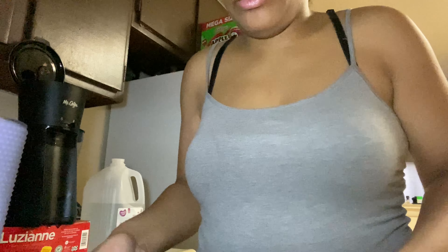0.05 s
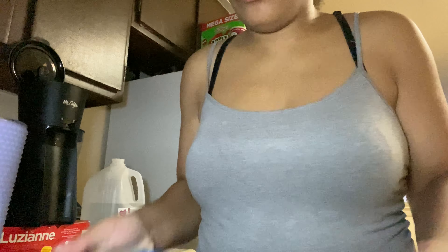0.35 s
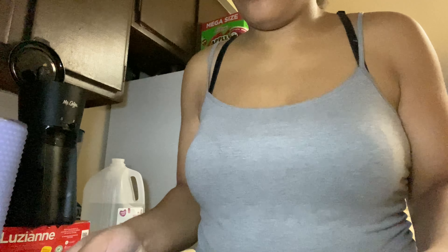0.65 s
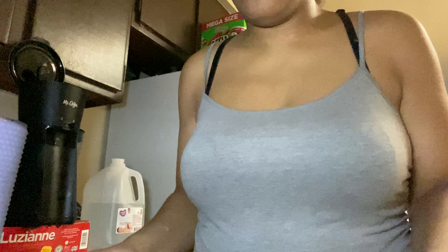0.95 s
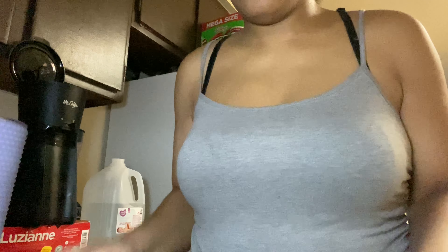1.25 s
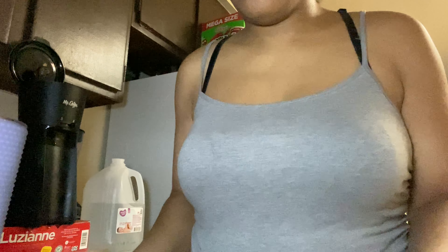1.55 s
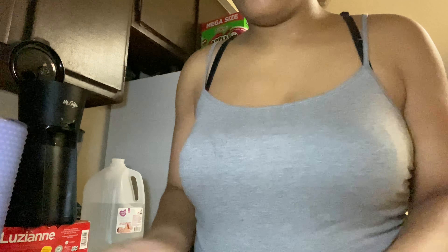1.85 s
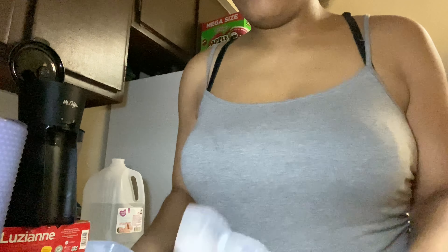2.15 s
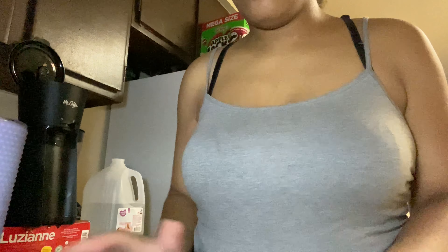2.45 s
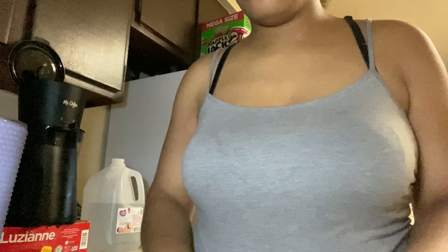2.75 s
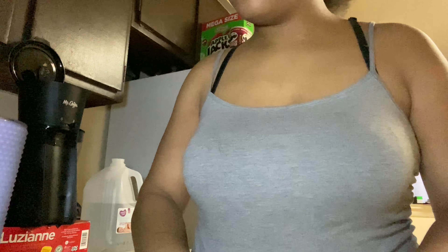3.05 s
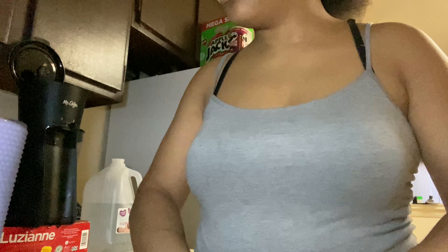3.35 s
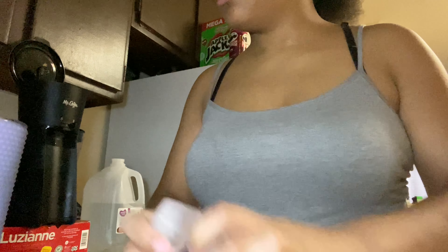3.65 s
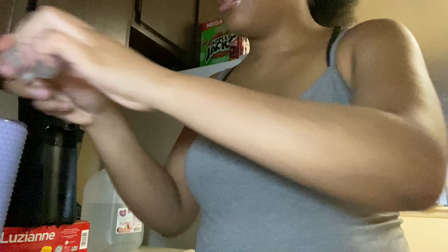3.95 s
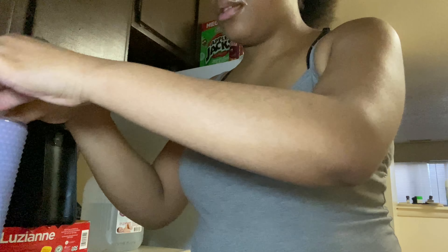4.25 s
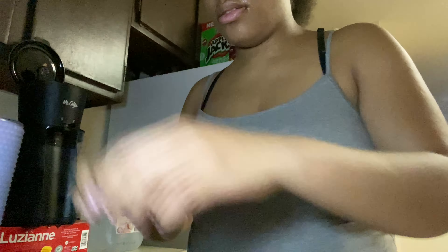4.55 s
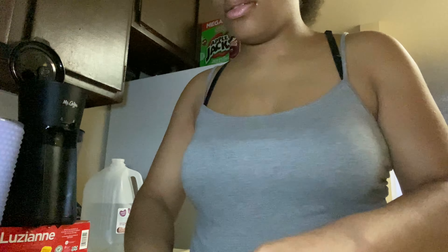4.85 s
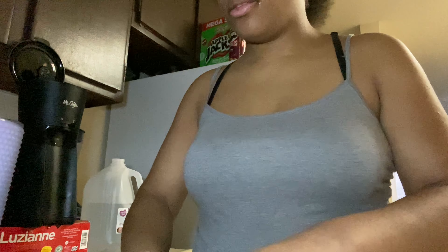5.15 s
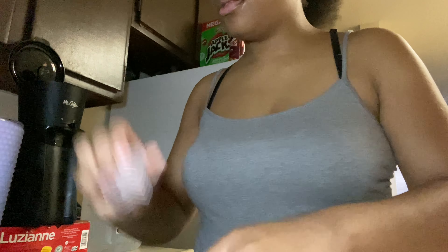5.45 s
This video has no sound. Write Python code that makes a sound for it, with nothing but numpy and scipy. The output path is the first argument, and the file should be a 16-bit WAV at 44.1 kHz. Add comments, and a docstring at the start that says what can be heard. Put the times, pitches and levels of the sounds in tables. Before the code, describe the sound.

Ice cubes crack and clatter in a twisted plastic tray, then a few drop into a ringing tumbler in a kitchen.

```python
"""Ice cubes clatter and crunch in a plastic tray, twisted again and again on a kitchen counter.
Cubes crack, squeak and tear from the plastic, then knock in their pockets. A few drop into a ringing
tumbler before the tray is handled again. Heavy blows sway the counter and a small hard room answers.
The sound is close; a limiter holds the peaks."""
import sys
import numpy as np
from scipy import signal
from scipy.fft import rfft, irfft
from scipy.io import wavfile
from scipy.ndimage import uniform_filter1d, minimum_filter1d

SR = 44100
rng = np.random.default_rng(int(sys.argv[2]) if len(sys.argv) > 2 else 0)


def file_out(sig):
    """Save sig as 16-bit WAV at sys.argv[1]."""
    # one column per channel
    cols = np.atleast_2d(sig).T
    # limit, then scale
    lim = np.clip(cols, -1, 1)
    pcm = np.round(lim * 32767).astype(np.int16)
    wavfile.write(sys.argv[1], SR, pcm)


N = 247842
TIME_S = np.arange(N) / SR
AGE_S = TIME_S[:SR // 10]  # time since a contact

# Loose cubes tumbling. Each row: start in s, length in s, level in dB, ring in Hz, tick offset in dB.
CLATTERS = [(0.303, 0.041, -8.5, 1610, -7), (0.536, 0.02, -15, 1250, -8), (0.858, 0.028, -6.5, 1785, -8.5),
            (.91, .02, -14.5, 1940, -3.5), (0.954, 0.029, -19, 1460, -4), (1.4, 0.06, -8, 1523, -7),
            (1.477, 0.062, -14.5, 1760, -18), (2.181, 0.19, -17, 1590, -5), (2.502, 0.17, -30, 1420, -12),
            (2.778, 0.16, -29, 1100, -3.5), (3.08, 0.034, -38, 1010, -5), (3.191, 0.06, -29, 1120, -7),
            (3.352, 0.022, -37.5, 1200, -31), (5.202, .04, -32, 2000, -3), (5.434, 0.032, -39.5, 2070, 0)]
# Dull blows of tray and tumbler. Each row: start in s, level in dB, centre in Hz.
BUMPS = [(0.04, -34, 160), (0.301, -21.5, 112), (.536, -22, 507), (1.391, -13, 461), (1.397, -21, 118),
         (2.008, -23.5, 808), (2.017, -25, 502), (2.022, -20.5, 168), (2.196, -15.5, 288),
         (2.202, -15, 163), (3.104, -30, 1134), (3.213, -28, 757), (4.134, -25.5, 344), (4.434, -17, 402),
         (4.44, -16.5, 168), (4.536, -13.5, 224), (4.775, -25, 490), (4.825, -27.5, 423)]
# Contact spectra, midrange clack and bright tick. Each row: frequency in Hz, density in dB.
CLACK_SPECTRUM = [(250, -20), (450, 6), (800, 2.5), (1300, -2), (2000, -1), (2700, -2), (3500, 1),
                  (4600, -18.5), (8000, -30)]
TICK_SPECTRUM = [(1200, -33), (2500, 4.5), (3600, 6.5), (5200, 1.5), (7500, 3), (10000, 2), (13000, 2.5),
                 (16000, -4)]


def knocks(clack_db=-9, ring_db=-7, tick_db=-7, thud_db=-9):
    """Each cube gives a clack of the whole tray, a short ring of its pocket, a hard tick and a thud."""
    # Each row: start in s, level in dB, ring in Hz, tick and thud offsets in dB.
    single_knocks = [(.042, -32.5, 2670, 9.5, -2.5), (.271, -30.5, 1630, 1, 9), (.3, -4, 1666, -5, -11),
                     (0.316, -11.5, 1330, -20, -6), (.339, -17, 1500, -13, -22.5), (.534, 0, 1280, -2, -27),
                     (.538, -3.5, 673, -2, -32), (.565, -3.5, 1690, -9, -17), (0.847, 6, 1940, -21, -20.5),
                     (.854, -4.5, 740, 6.5, -28), (0.859, -13, 1480, -15, -29), (.939, 7.5, 1884, -31, -37),
                     (0.949, -12, 1850, -5.5, -7.5), (.992, -9, 1685, -8, -28),
                     (1.065, -18, 1780, -12, -27), (1.119, -13, 1456, -9, -12),
                     (1.105, -28, 1730, -26, -35), (1.354, -13.5, 1340, 6, -24),
                     (1.391, -1, 1180, -12, -1.5), (1.411, 4.5, 2006, -4, -16), (1.438, -1, 1614, -13, -10),
                     (1.466, -5, 1480, -18, -37), (1.483, -6.5, 1880, -22.5, -25),
                     (1.5, -4, 1950, -7.5, -15), (1.545, -15, 1320, -11.5, -19.5),
                     (1.555, -11, 1510, 0.5, -7), (1.602, -17.5, 1170, -11, 2.5),
                     (1.624, -16, 1207, 0, -19), (1.649, -23.5, 1704, -5, -9), (2.041, -21, 1784, 0.5, 2),
                     (2.194, -0.5, 1210, -13.5, -8), (2.212, -6, 2220, -18, -28),
                     (2.274, -2.5, 2070, -13, -33), (2.3, -8.5, 2200, -17, -13),
                     (2.306, -12, 2100, -22, -30), (2.354, -16, 1980, -21.5, -17.5),
                     (2.359, -11.5, 1270, -15, 0), (2.404, -24, 1630, -14, -19),
                     (2.455, -12, 1220, -21.5, -3.5), (2.491, -22, 1170, -8, -2),
                     (2.56, -18, 1410, -9, -19), (2.642, -21, 1950, -9, -25.5),
                     (2.655, -20, 1890, -16.5, -24), (2.746, -12, 1134, -15.5, -21),
                     (2.756, -9.5, 1616, -14.5, -32), (2.786, -21.5, 1090, -8, -27.5),
                     (2.807, -18, 1340, -6, -7), (2.83, -26, 1120, -8, -10), (2.928, -10.5, 1370, -16, -28),
                     (2.976, -20.5, 1520, -1.5, -28), (3.101, -25, 1100, -24, -21),
                     (3.118, -19, 1090, -13.5, -12), (3.213, -16.5, 1880, -13.5, -31),
                     (3.249, -21.5, 1046, -20, -15), (3.313, -24.5, 1140, -16, -23),
                     (3.379, -28, 1094, -33, -11.5), (4.856, -25.5, 1315, -10.5, -24.5),
                     (4.886, -30, 1490, -3, -30), (4.938, -28, 1610, 1.5, -17), (5.016, -23, 986, -24, -6),
                     (5.024, -31, 1370, -23, -8), (5.079, -35, 1310, -19, 7), (5.152, -30.5, 2500, 2, -3),
                     (5.369, -19.5, 2040, 0, -13)]
    # Each row: frequency in Hz, density in dB.
    thud_spectrum = [(50, -26), (110, 4), (200, -1.5), (400, 3), (600, -7.5), (1000, -22), (2500, -54.5)]
    out = np.zeros(N)
    for start_s, db, hz, tick_offset_db, thud_offset_db in single_knocks + clatter_knocks():
        # a soft contact lasts longer and leaves out the upper modes
        softened = resonate(burst(.036, CLACK_SPECTRUM), hz, 1.5 * hz)
        clack = blow(tray_body(softened, direct=.48))
        pocket = modal(hz * np.array([.86, 1, 1.12]), [-6, 0, -6], .024, AGE_S, scatter_db=.5)
        ring = blow(pocket * rise(AGE_S, .00068))
        tick = blow(facets(burst(.021, TICK_SPECTRUM), direct=.3, width_hz=220))
        sound = undb(clack_db) * clack + undb(ring_db) * ring
        sound += undb(tick_db + tick_offset_db) * tick
        sound += undb(thud_db + thud_offset_db) * burst(.086, thud_spectrum)
        add(out, start_s, undb(db) * sound)
    return out


def clatter_knocks(count=5, spread_db=.5, spread_octaves=.2, thud_offset_db=-22):
    """Rows for knocks(): a clatter is a few unevenly spaced hits, each from another cube."""
    rows = []
    for start_s, length_s, db, hz, tick_offset_db in CLATTERS:
        times_s = start_s + length_s * (np.arange(count) + rng.random(count)) / count
        for hit_s, (force, detune, edge) in zip(times_s, rng.standard_normal((count, 3))):
            rows.append((hit_s, db + spread_db * force, hz * 2 ** (spread_octaves * detune),
                         tick_offset_db + spread_db * edge, thud_offset_db))
    return rows


def tray_body(x, direct):
    """Sound passes through the resonances of the plastic tray."""
    # Each row: frequency in Hz, width in Hz, gain in dB.
    modes = [(450, 210, -4.5), (760, 140, -13), (923, 140, -4), (1087, 190, -0.5), (1194, 85, 7),
             (1434, 100, 3.5), (1561, 70, 9), (1788, 140, 7), (1980, 36, 1.5), (2090, 70, -2),
             (2694, 190, -5), (3438, 250, -2.5), (4436, 170, 1.5)]
    return direct * x + sum(undb(db) * resonate(x, hz, width_hz) for hz, width_hz, db in modes)


def facets(x, direct, width_hz, count=9):
    """Each piece of ice has its own bright resonances; the lowest is width_hz wide."""
    modes_hz = 2500 * 5.6 ** ((np.arange(count) + rng.random(count)) / count)
    return direct * x + sum(resonate(x, hz, width_hz * np.sqrt(hz / modes_hz[0])) for hz in modes_hz)


def crunches():
    """Ice tears from the flexing plastic in showers of tiny fractures, each from another cube."""
    # Each row: crest in s, level in dB, half width in s.
    showers = [(.004, -37.5, 0.0081), (.14, -31.5, .017), (.234, -32.5, .014), (.314, -13, 0.018),
               (0.463, -27, 0.0061), (0.498, -33, 0.0099), (.524, -16, 0.0031), (0.538, -27, 0.009),
               (0.568, -17, 0.0054), (.722, -35.5, 0.019), (0.818, -16, 0.0091), (0.871, -20.5, 0.019),
               (.95, -26.5, 0.044), (1.128, -25, 0.011), (1.258, -37, 0.0084), (1.351, -19.5, 0.0049),
               (1.424, -20, 0.047), (1.6, -23, 0.016), (1.655, -23.5, 0.01), (2.051, -26.5, 0.0099),
               (2.148, -15, .0092), (2.228, -27.5, 0.066), (2.668, -36.5, 0.017), (2.818, -39.5, 0.016),
               (2.977, -39, 0.013), (4.524, -19, 0.014), (5.149, -40.5, 0.0091), (5.224, -40, 0.028),
               (5.281, -41, 0.0079), (5.35, -34.5, 0.0059), (5.46, -40.5, 0.012)]
    # Each row: frequency in Hz, density in dB.
    spectrum = [(150, -47.5), (400, -18), (800, -3.5), (1250, -5), (2200, -2), (2800, -5), (3600, -3),
                (5200, -8.5), (7400, -4.5), (9600, -4), (12400, -7), (16000, -10)]
    out = np.zeros(N)
    fractures = colour(grains(rate_per_s=4000, spread_db=3), spectrum)
    body = tray_body(fractures, direct=0)
    for crest_s, db, half_width_s in showers:
        span, envelope = swell(crest_s, half_width_s)
        cube = facets(fractures[span], direct=.45, width_hz=480)
        out[span] += undb(db) * envelope * unit(cube + 1.1 * body[span])
    return out


def squeaks(waver_hz=260):
    """A cube sticks and slips on the plastic so fast that it sings briefly on one rough pitch."""
    # Each row: crest in s, level in dB, pitch in Hz.
    slips = [(.139, -28, 4300), (.168, -29, 3850), (.229, -31, 4400), (.303, -19, 3650), (.331, -16, 3550),
             (.52, -23, 4400), (.563, -21, 9500), (.82, -22, 3450), (1.354, -20, 3600), (2.328, -26, 3950),
             (3.24, -36, 4430), (5.213, -31, 2100), (5.446, -33, 2000), (5.466, -30, 2100)]
    out = np.zeros(N)
    waver = wander(samples=40)
    for crest_s, db, hz in slips:
        span, envelope = swell(crest_s, half_width_s=.0035)
        pitch_hz = hz + waver_hz * waver[span]
        out[span] += undb(db) * blow(envelope * np.sin(2 * np.pi * np.cumsum(pitch_hz) / SR))
    return out


def tumbler(clack_db=-3, ring_db=-2, tick_db=-1, thud_db=-1):
    """Cubes hit the rim, fall to the bottom and bounce; every blow rings the wall."""
    # Each row: start in s, level in dB, then tick, thud and ring offsets in dB.
    drops = [(4.126, -35, 7, 10.5, -20), (4.167, -38, -11, -21, -17), (4.237, -51.5, 3, 16, -13),
             (4.258, -38.5, 6, -1, -23), (4.305, -37, 8, 12, -10), (4.432, -8, -13.5, -3, -1.5),
             (4.44, -19.5, 4.5, 0.5, 12), (4.521, -14, -20, -11, 1), (4.528, -13, -3, -11, 5),
             (4.538, -13.5, -0.5, -7.5, 5.5), (4.587, -26.5, -2, 1, 7), (4.61, -17, -9, -11, -1),
             (4.703, -22, -25, -1.5, 4.5), (4.825, -30.5, -25, 6, 1)]
    # Each row: frequency in Hz, level in dB, t60 in s.
    wall_modes = [(222, -11, .16), (338, -12, .24), (461, 3, .27), (715, -2, .15), (791, -7, .35),
                  (1175, -10, .36), (1715, -3, .13), (1835, -3, .12), (1885, -1, .22), (2110, -9, .25),
                  (2645, -2, .2), (2750, -4, .18), (3350, -9, .15), (3994, -14, .28), (4900, 0, .13),
                  (5400, -11, .08), (5900, -10, .12), (6282, -11, .12), (6928, -14, .09), (8129, -21, .22),
                  (8400, -8.5, .1)]
    # Air and floor of the tumbler under a blow. Each row: frequency in Hz, density in dB.
    hollow_spectrum = [(60, 0), (130, 2), (210, 6), (380, 12.5), (540, -15.5), (800, 5), (1200, -9),
                       (2500, -71)]
    contacts, ringing = np.zeros(N), np.zeros(N)
    for start_s, db, tick_offset_db, thud_offset_db, ring_offset_db in drops:
        ring = modal(*np.transpose(wall_modes), TIME_S[:SR // 2], scatter_db=3.5)
        add(ringing, start_s, undb(db + ring_db + ring_offset_db) * ring)
        tick = blow(facets(burst(.068, TICK_SPECTRUM), direct=.23, width_hz=960))
        contact = undb(clack_db) * burst(.06, CLACK_SPECTRUM) + undb(tick_db + tick_offset_db) * tick
        contact += undb(thud_db + thud_offset_db) * burst(.095, hollow_spectrum)
        add(contacts, start_s, undb(db) * contact)
    # loose ice chatters against the wall and roughens its ring
    chatter = 1 + .42 * wander(samples=260)
    return contacts + chatter * ringing


def bumps():
    """Dull blows on the counter: a soft push into a few low, quickly damped modes."""
    out = np.zeros(N)
    ratios, modes_db = np.array([.7, .86, 1, 1.2, 1.45]), [-4, -3, 0, -3, -3]
    for start_s, db, hz in BUMPS:
        thump = modal(hz * ratios, modes_db, .068, AGE_S, scatter_db=1.5) * rise(AGE_S, .00057)
        add(out, start_s, undb(db) * blow(resonate(thump, hz, width_hz=hz)))
    return out


def counter_sway(shake_db=-3, reference_hz=118):
    """Soft, heavy blows sway the counter top; harder, higher ones shake it less."""
    # Each row: frequency in Hz, level in dB, t60 in s.
    modes = [(54, -3.5, 0.57), (78.7, -15, 0.55)]
    out, t = np.zeros(N), TIME_S[:SR]
    sway = blow(sum(undb(db) * fade(t, t60_s) * np.sin(2 * np.pi * hz * t) for hz, db, t60_s in modes))
    for start_s, db, hz in BUMPS:
        add(out, start_s, undb(db + shake_db) * (reference_hz / hz) ** 2 * sway)
    return out


def snaps():
    """The ice gives dry, very short cracks."""
    # Each row: start in s, level in dB.
    cracks = [(0.084, -43), (0.71, -51.5), (1.058, -31), (2.255, -32), (2.606, -42), (2.698, -40.5),
              (2.797, -32), (2.843, -35.5), (2.956, -45), (3.285, -44), (3.756, -62.5), (4.04, -29)]
    # Each row: frequency in Hz, density in dB.
    spectrum = [(400, -24.5), (1000, -10), (2000, 2), (4000, 3), (8000, -3.5), (16000, -13)]
    out = np.zeros(N)
    for start_s, db in cracks:
        add(out, start_s, undb(db) * burst(.022, spectrum))
    return out


def handling(rumble_db=-3, rub_db=-1, slide_db=-11, scratch_db=-5, creep_db=-9):
    """Tray or tumbler drags on the counter while cubes slide and scratch in their pockets."""
    # Each row: start in s, length in s, then counter rumble, low rub and fine scratch in dB.
    pushes = [(.04, .305, -46.5, -53.5, -39), (0.41, .13, -55, -58.5, -38.5),
              (0.766, 0.08, -51, -43, -32.5), (1.12, 0.15, -60, -57.5, -45.5), (1.318, 0.39, -42, -44, -46),
              (2.018, 0.077, -28.5, -40, -56), (2.144, 0.2, -37, -42.5, -34.5),
              (2.416, 0.54, -39.5, -41.5, -52), (3.081, 0.28, -53, -47.5, -55),
              (4.123, 0.34, -48, -42.5, -63), (4.42, 0.1, -38, -30.5, -29), (4.628, 0.23, -44, -39.5, -44),
              (4.9, 0.53, -52, -56.5, -49.5)]
    # Each row of both: frequency in Hz, density in dB.
    rumble_spectrum = [(22, -41.5), (40, -5), (53, -1), (68, -4), (100, -2), (180, -41.5), (500, -58.5)]
    rub_spectrum = [(60, -17), (120, -2), (175, 9), (260, -3.5), (450, 2.5), (800, -25), (2000, -38)]
    envelopes = [stroke(start_s, length_s, attack_s=.0086, t60_s=.38) for start_s, length_s, *_ in pushes]
    rumble, rub, scratch = undb(np.transpose(pushes)[2:]) @ np.array(envelopes)
    # cubes creep whenever they scratch and slide hard during a clatter
    slide = undb(creep_db) * scratch
    for start_s, length_s, db, *_ in CLATTERS:
        slide += undb(db + slide_db) * stroke(start_s, length_s, attack_s=.006, t60_s=.086)
    slips = grains(rate_per_s=700, spread_db=2)
    pressure = undb(4 * wander(samples=250))
    out = undb(rumble_db) * rumble * unit(colour(rng.standard_normal(N), rumble_spectrum))
    out += undb(rub_db) * rub * unit(colour(grains(rate_per_s=700, spread_db=1.5), rub_spectrum))
    out += slide * unit(tray_body(colour(slips, CLACK_SPECTRUM), direct=.13))
    grit = colour(grains(rate_per_s=6000, spread_db=2.5), TICK_SPECTRUM)
    return out + undb(scratch_db) * scratch * unit(pressure * grit)


def kitchen_echo(x):
    """Diffuse echo from cupboards and walls; the treble dies first."""
    # Each row: centre in Hz, level in dB, t60 in s.
    bands = [(80, -18, 0.9), (250, -13, 0.94), (696, -8, 0.43), (1200, -9.5, 0.53), (1920, -11, 0.57),
             (4040, -15.5, 0.5), (7600, -12.5, 0.39), (15080, -33.5, 0.19)]
    t, bins_hz = TIME_S[:SR], np.maximum(np.fft.rfftfreq(SR, 1 / SR), 1)
    noise, response = rfft(rng.standard_normal(SR)), 0
    log_centres = np.log(np.transpose(bands)[0])
    for share, (_, db, t60_s) in zip(np.eye(len(bands)), bands):
        envelope = fade(t, t60_s) * rise(t, .0023)
        band = irfft(noise * np.interp(np.log(bins_hz), log_centres, share))
        response += undb(db) * band * envelope / np.sqrt(np.sum(envelope ** 2))
    return signal.fftconvolve(x, response)[:N]


def room_tone(level_db=-57.5):
    """Faint, steady, mostly low noise of the room."""
    # Each row: frequency in Hz, density in dB.
    spectrum = [(15, -35), (25, -10), (59, -3), (190, -10), (503, -15.5), (607, -20.5), (796, -17.5),
                (1400, -22.5), (1790, -25), (2480, -30), (5730, -39.5), (12200, -41), (16000, -44.5)]
    return undb(level_db) * unit(colour(rng.standard_normal(N), spectrum))


def undb(db):
    """Decibels to gain."""
    return 10 ** (np.asarray(db) / 20)


def unit(x):
    """Scale to rms 1."""
    return x / np.sqrt(np.mean(x ** 2))


def blow(x):
    """Scale a short sound to the energy of 5 ms at rms 1."""
    return x * np.sqrt(.005 * SR / np.sum(x ** 2))


def add(out, start_s, x):
    """Mix x into out."""
    i = max(int(start_s * SR), 0)
    out[i:i + len(x)] += x[:N - i]


def rise(t, tau_s):
    """Exponential approach to 1."""
    return 1 - np.exp(-t / tau_s)


def fade(t, t60_s):
    """Exponential decay, 60 dB in t60_s."""
    return np.exp(-np.log(1000) * t / t60_s)


def swell(crest_s, half_width_s):
    """Sample indices around a crest and a rounded envelope over them."""
    distance_s = np.abs(TIME_S - crest_s)
    span = np.flatnonzero(distance_s < 4 * half_width_s)
    return span, np.exp(-.5 * (distance_s[span] / half_width_s) ** 1.88)


def stroke(start_s, length_s, attack_s, t60_s):
    """Attack, hold and release of one movement."""
    t = TIME_S - start_s
    return np.clip(t / attack_s, 0, 1) * fade(np.maximum(t - length_s, 0), t60_s)


def wander(samples):
    """Noise smoothed over so many samples, at rms 1."""
    return unit(uniform_filter1d(rng.standard_normal(N), size=samples))


def grains(rate_per_s, spread_db):
    """Random tiny clicks, a few much larger than the rest."""
    clicks = (rng.random(N) < rate_per_s / SR) * rng.standard_normal(N)
    return unit(clicks * undb(spread_db * rng.standard_normal(N)))


def burst(t60_s, spectrum):
    """A contact that chatters and dies away, as coloured noise."""
    return blow(colour(rng.standard_normal(len(AGE_S)) * fade(AGE_S, t60_s), spectrum))


def modal(hz, db, t60_s, t, scatter_db):
    """Decaying modes; where the blow lands decides each one's share, drawn at random."""
    gains = undb(db + scatter_db * rng.standard_normal(len(hz)))
    t = t[:, None]
    tones = np.sin(2 * np.pi * (hz * t + rng.random(len(hz))))
    return blow(np.sum(gains * fade(t, t60_s) * tones, axis=1))


def resonate(x, hz, width_hz):
    """One resonance, gain 1 at the centre."""
    return signal.lfilter(*signal.iirpeak(hz, max(hz / width_hz, .5), SR), x)


def colour(x, spectrum, size=4096):
    """Causal filter through (Hz, dB) points, built from the cepstrum."""
    hz, db = np.transpose(spectrum)
    bins_hz = np.maximum(np.fft.rfftfreq(size, 1 / SR), 1)
    gain = undb(np.interp(np.log(bins_hz), np.log(hz), db))
    cepstrum = irfft(np.log(gain))
    cepstrum[1:size // 2] *= 2
    cepstrum[size // 2 + 1:] = 0
    return signal.fftconvolve(x, irfft(np.exp(rfft(cepstrum))))[:len(x)]


def scene():
    """Ice, tray, tumbler and counter in the quiet kitchen, in mono."""
    near = knocks() + crunches() + squeaks() + tumbler() + bumps() + counter_sway() + snaps() + handling()
    return (near + room_tone() + kitchen_echo(near))[None]


def record(dry, ceiling=.83, release_db_per_s=350, top_hz=16100):
    """A fast limiter holds the loudest peaks and lets go steadily, then the top is cut."""
    over_db = np.maximum(20 * np.log10(np.abs(dry) / ceiling + 1e-9), 0)
    recovered_db = release_db_per_s * TIME_S
    gain = undb(recovered_db - np.maximum.accumulate(over_db + recovered_db))
    gain = uniform_filter1d(minimum_filter1d(gain, size=60), size=60)
    return signal.sosfilt(signal.ellip(10, .2, 80, top_hz, fs=SR, output="sos"), dry * gain)


dry = scene()
out = record(dry)
file_out(out)
```